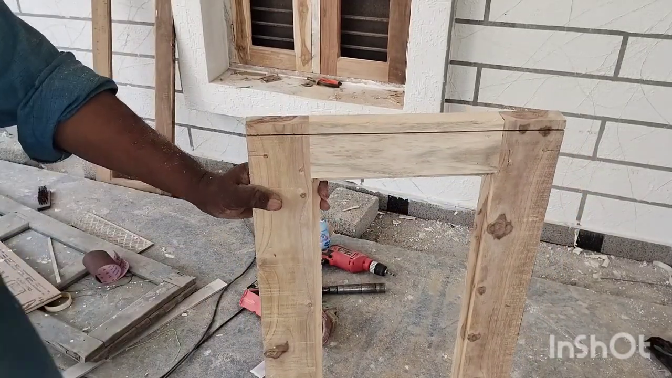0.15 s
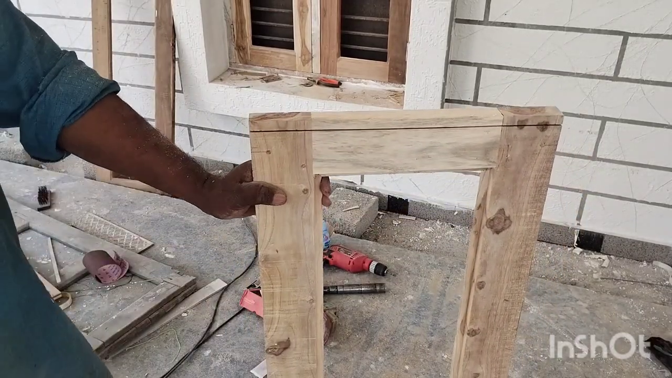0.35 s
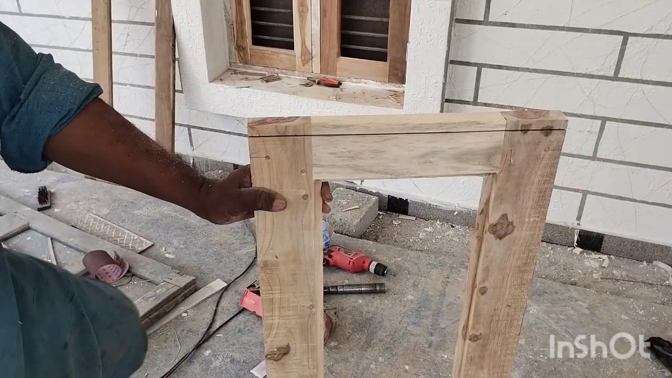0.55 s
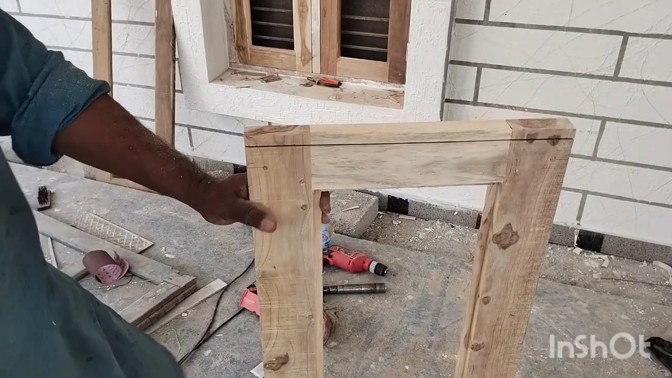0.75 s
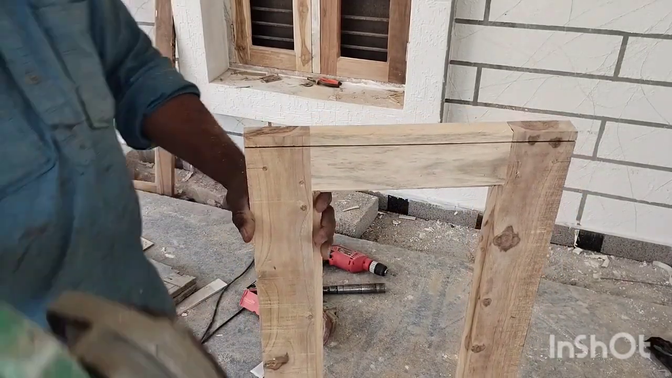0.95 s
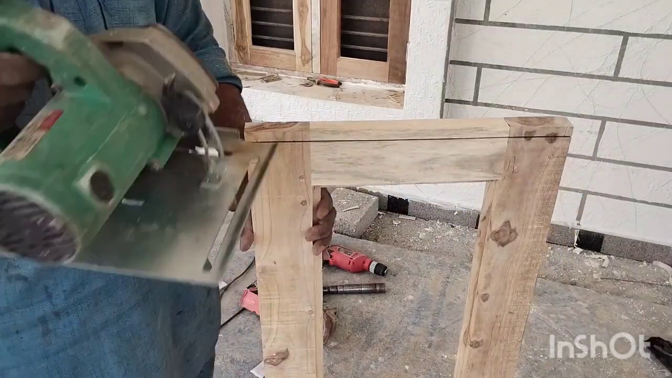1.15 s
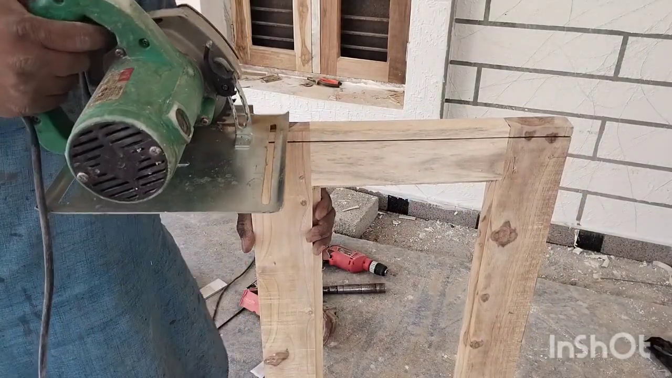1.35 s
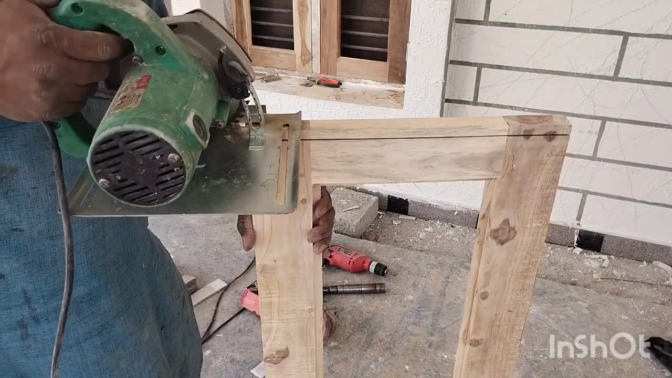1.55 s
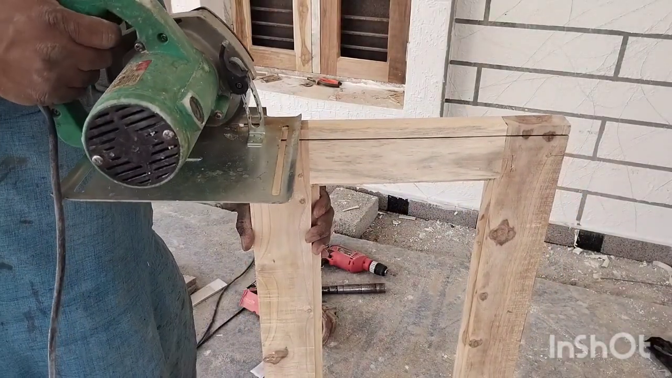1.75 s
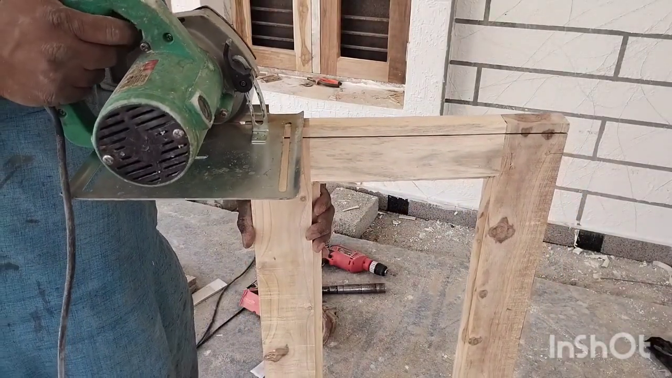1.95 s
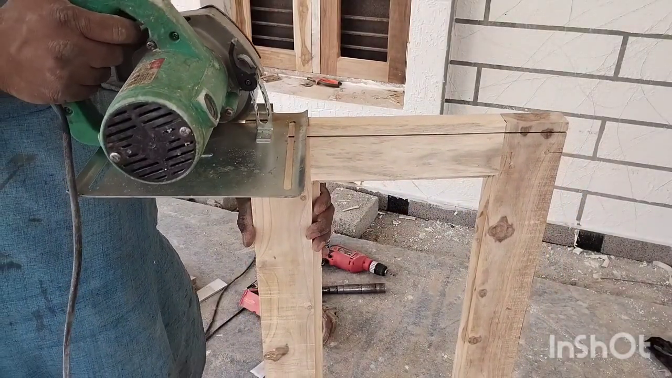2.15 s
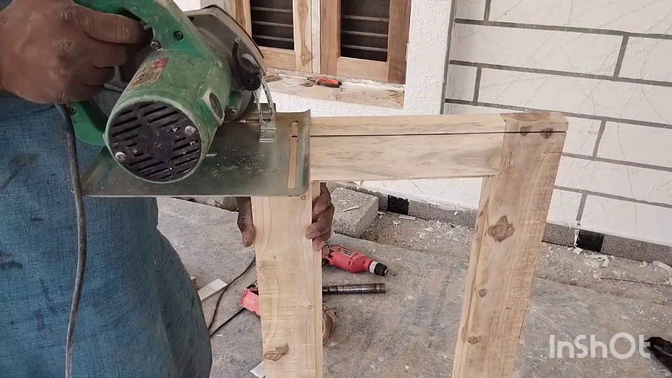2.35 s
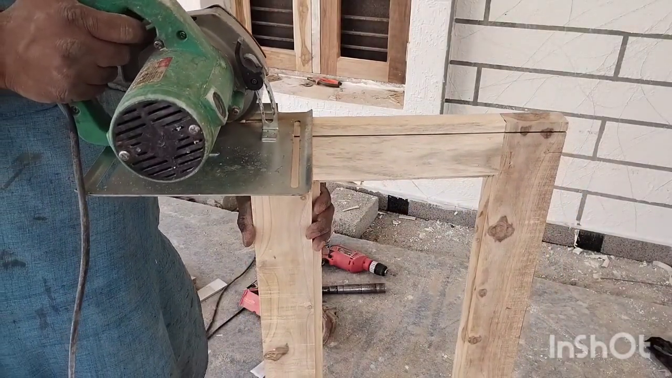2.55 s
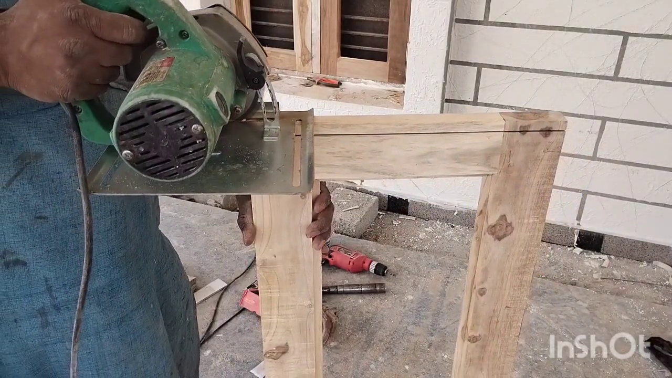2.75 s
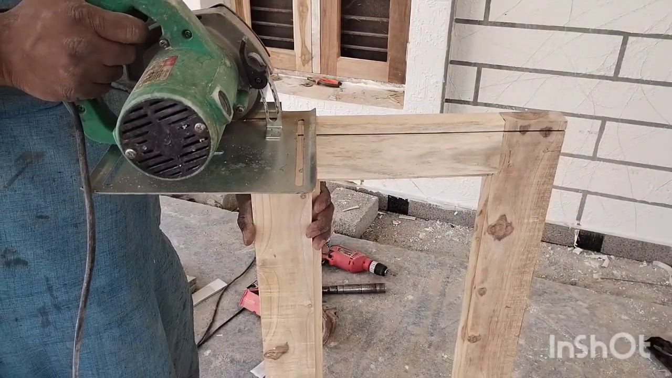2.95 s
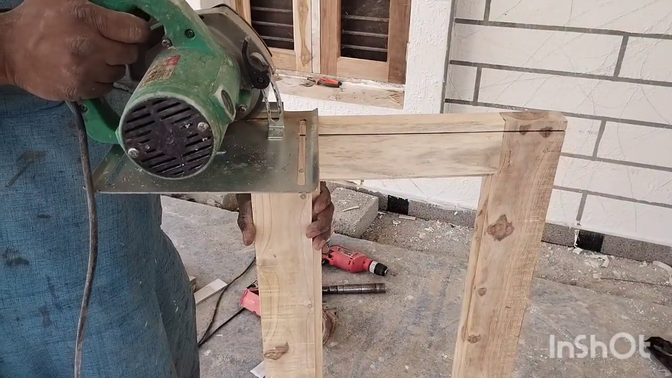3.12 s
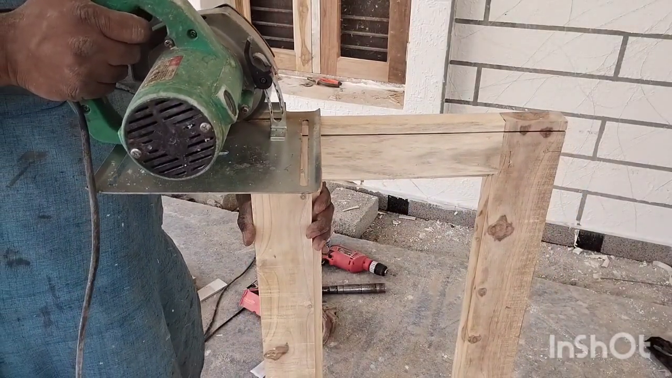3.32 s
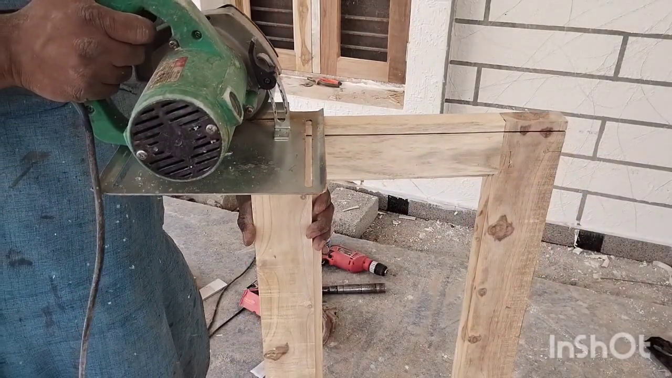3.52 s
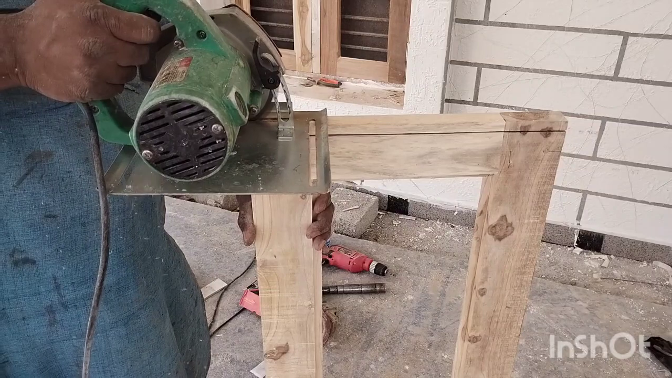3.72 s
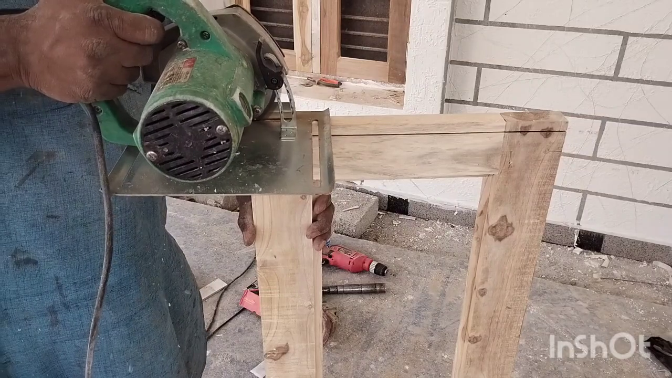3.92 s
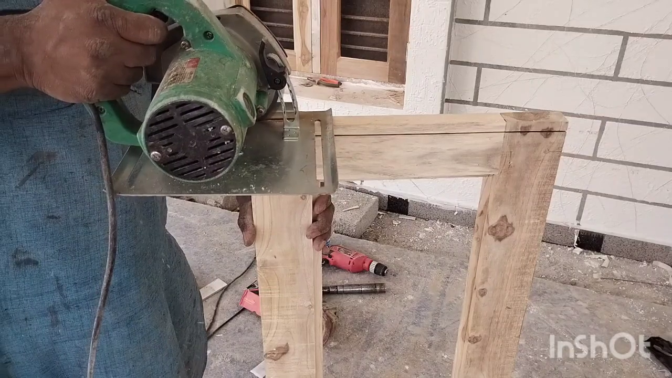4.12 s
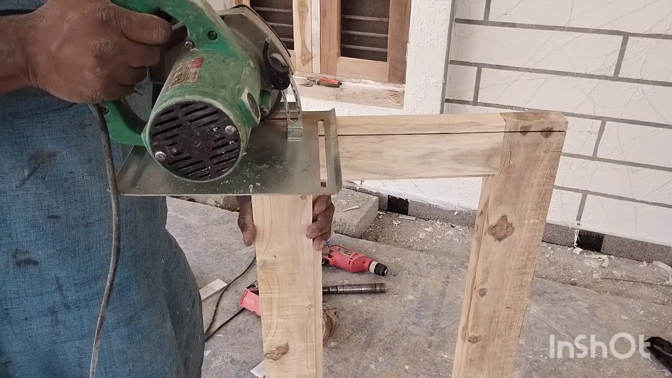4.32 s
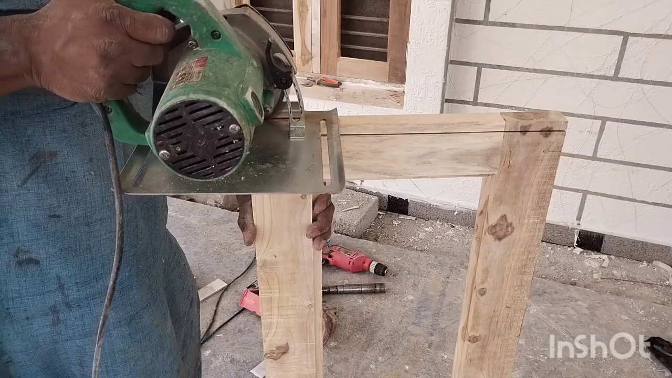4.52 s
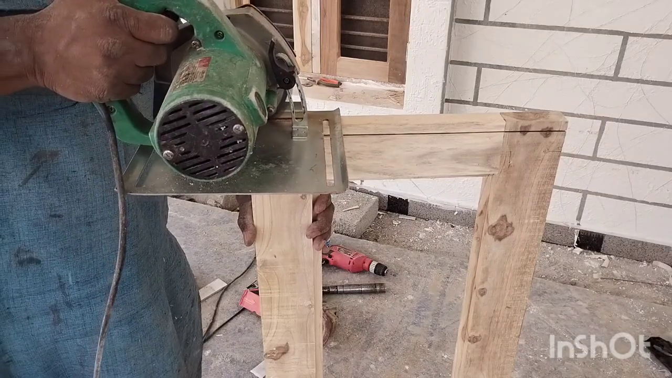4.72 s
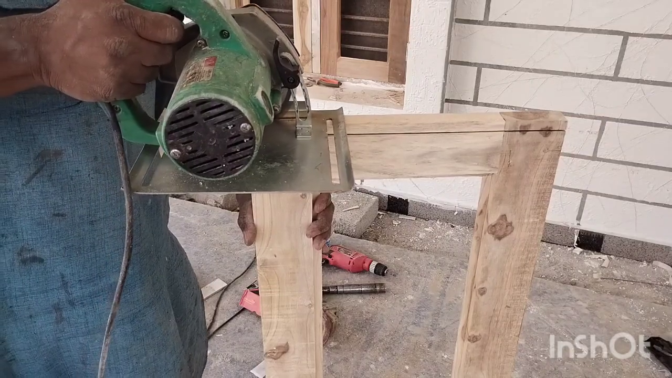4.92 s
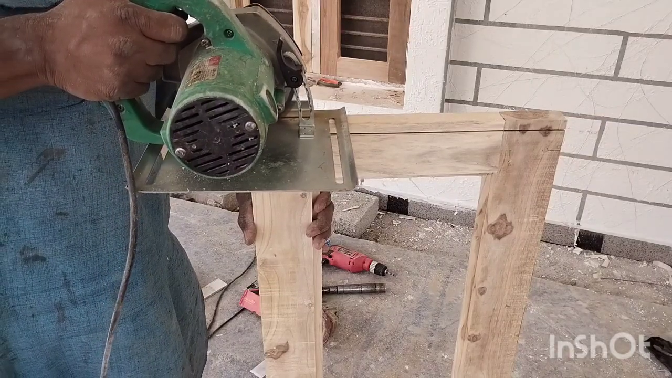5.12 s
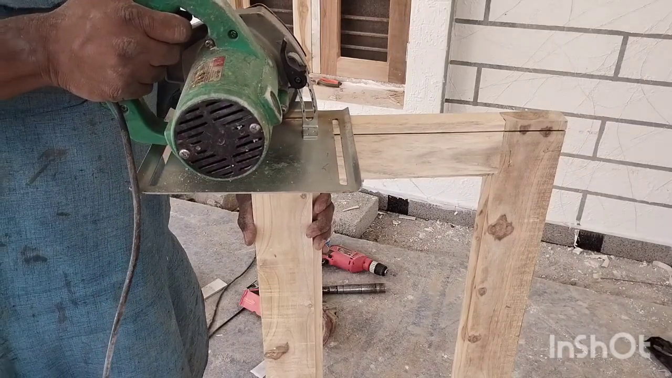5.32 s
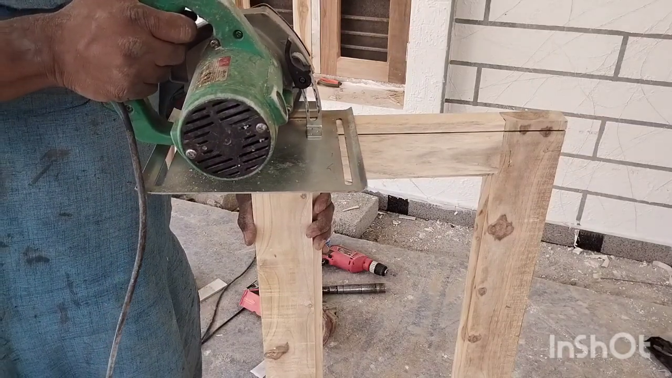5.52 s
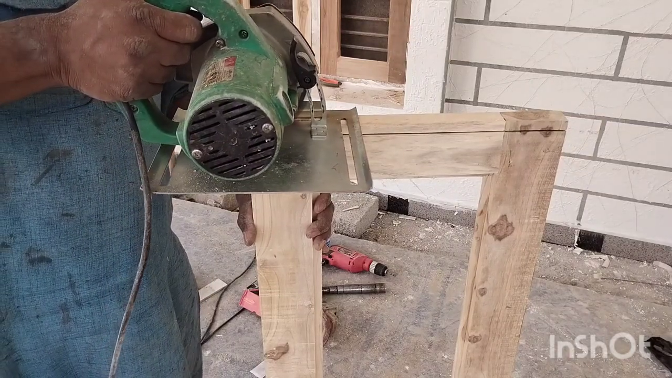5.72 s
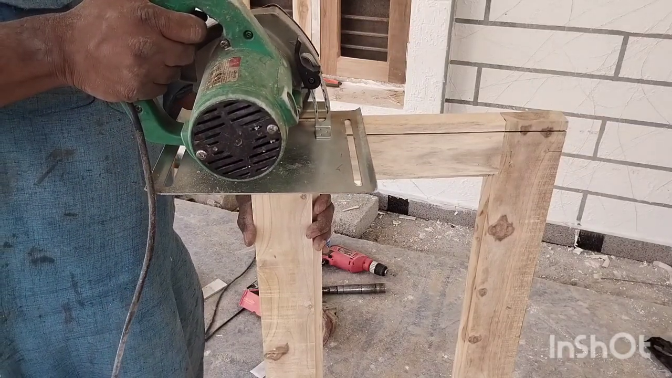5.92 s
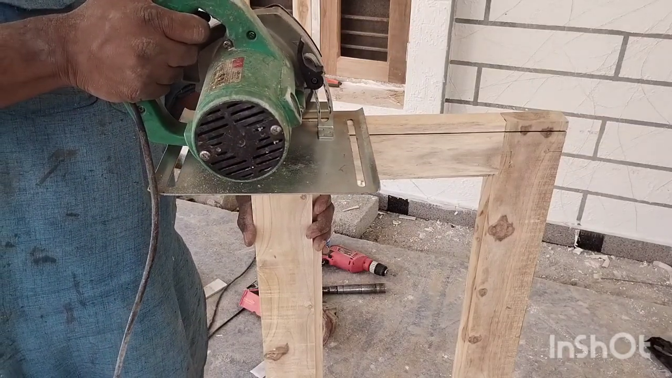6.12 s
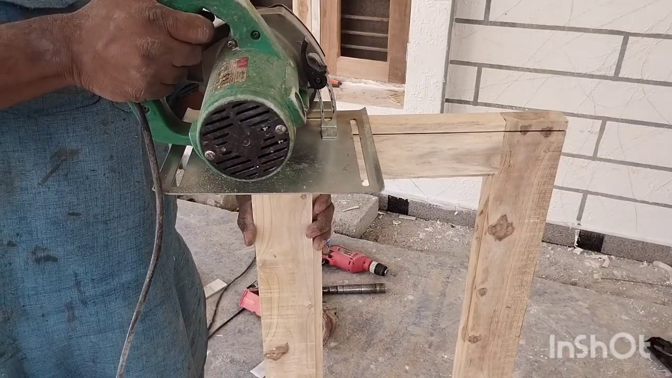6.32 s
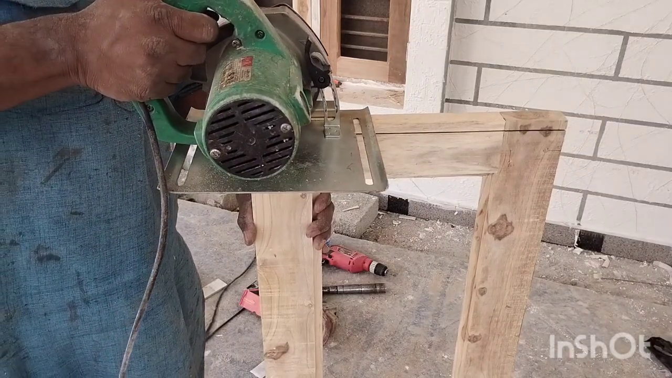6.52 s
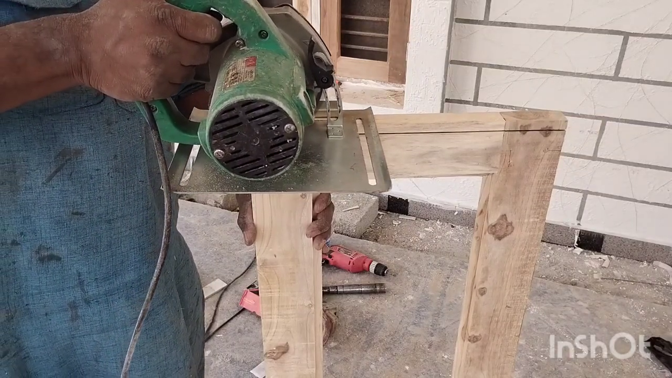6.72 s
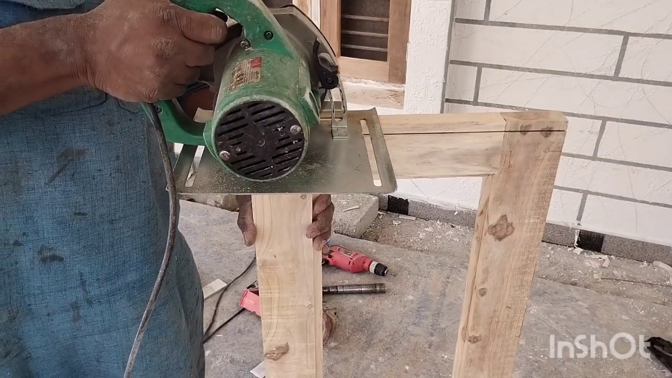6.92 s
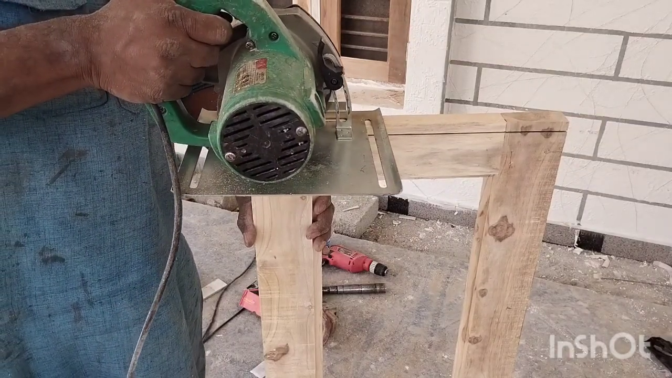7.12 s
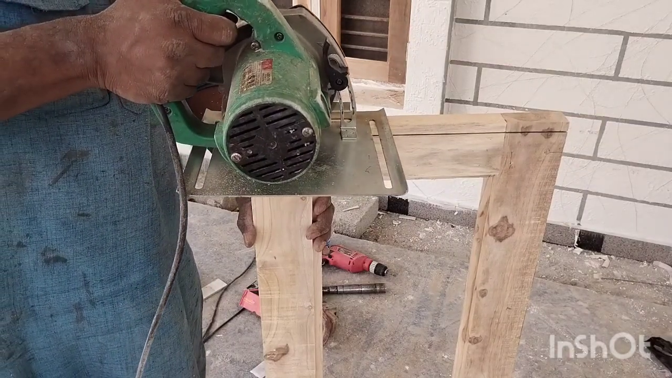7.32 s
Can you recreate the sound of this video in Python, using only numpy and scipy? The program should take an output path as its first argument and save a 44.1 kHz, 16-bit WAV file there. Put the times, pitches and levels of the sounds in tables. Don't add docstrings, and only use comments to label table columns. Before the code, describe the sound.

Outdoors in a hard-walled yard, heard close in stereo with light hiss and faint low rumble. From 0 to 1.7 s, shoes and cloth scuff grittily; wooden knocks fall near 0.3, 0.8 and 1.2 s, then several around 1.4 to 1.55 s, with tiny joint squeaks and a short rising groan. At 1.78 s a hard clack of the tool on timber starts rapid, loose metallic chatter until about 2.45 s. The disc then sings brightly over a rushing hiss, with snags near 2.6, 2.8 and 3.2 s. At 3.3 s it surges into the wood: a loud, harsh, ringing roar with uneven feed, a clear gear whine climbing until about 4.4 s, then slowly falling and fading under the roar by 6 s. The pitch sags slightly from 6.5 s. At 7.1 s there is a faint low knock and the disc begins slowing, still loud at the 7.4 s end.

```python
import sys
import numpy as np
from scipy import signal
from scipy.fft import rfft, irfft, next_fast_len
from scipy.io import wavfile
from scipy.ndimage import uniform_filter1d, map_coordinates

SR = 44100
rng = np.random.default_rng(int(sys.argv[2]) if len(sys.argv) > 2 else 0)


def rack_gain(trim_db):
    fader = np.asarray(trim_db, float)
    return 10 ** (fader / 20)


def dump_mix(stems):
    frames = np.atleast_2d(stems).T
    limited = np.clip(frames, -1, 1)
    pcm = np.round(limited * 32767).astype(np.int16)
    wavfile.write(sys.argv[1], SR, pcm)


N = 328986
T = np.arange(N) / SR


def unit(x):
    return x / np.sqrt(np.mean(np.abs(x) ** 2) + 1e-20)


def along(points, hz):
    f, v = np.transpose(points)
    return np.interp(np.log(hz + 1), np.log(f + 1), v)


def curves(rows):
    s, *cols = np.transpose(rows)
    return [np.interp(T, s, c) for c in cols]


def gate(rows, fade=0.015):
    opening = np.clip((T - rows[0][0]) / fade, 0, 1)
    closing = np.clip((rows[-1][0] + fade - T) / fade, 0, 1)
    return opening * closing


def wobble(rate):
    coarse = np.arange(0, N + 8, 8) / SR
    knots = rng.standard_normal(int(N * rate / SR) + 4)
    return np.interp(T, coarse, map_coordinates(knots, [coarse * rate]))


def filtered(x, response):
    m = next_fast_len(N + SR // 4)
    return irfft(rfft(x, m) * response(np.fft.rfftfreq(m, 1 / SR)), m)[..., :N]


def ringing(peaks):
    def response(f):
        return sum((-1) ** k * rack_gain(db) * 1j * f * w / (c * c - f * f + 1j * f * w)
                   for k, (c, w, db) in enumerate(peaks))
    return response


def grit(colour, grain_db, rate):
    grains = rng.standard_normal(N) * rack_gain(grain_db * wobble(rate))
    return unit(filtered(grains, lambda hz: rack_gain(along(colour, hz))))


def band(hz, width_hz):
    turn = 2 * np.pi * np.cumsum(hz) / SR
    steady = 2 * (width_hz < 50)
    return unit((wobble(width_hz) + steady) * np.cos(turn) + wobble(width_hz) * np.sin(turn))


# (time [s], effort [dB], bite into the wood [0-1])
RUN = [
    [(2.43, -1.5, 1), (2.486, 0, 0.45), (2.86, -0.5, 0.22), (3.1, 2, 0.6), (3.29, 0.5, 1)],
    [(3.27, -2, 1), (3.3, 1, 0.75), (3.36, 1, 0.32), (3.56, -0.5, 0.27), (3.63, 1, 0.6), (3.77, -0.5, 0.77),
     (4.5, 0.5, 0.96), (5.04, 0, 0.43), (5.46, 1, 0.71), (6.36, 0, 0.35), (7.08, 0, 0.13)],
    [(7.06, -25, 0.44), (7.1, 0.5, 0.84), (7.16, -2, 0.18), (7.26, -1, 0.52), (7.46, 1, 0.6)],
]
SPINUP_S, SPINUP_TAU_S, STALL_S, STALL_PER_S = 3.31, .16, 6.5, 0.1005


def slides():
    def drift(rows):
        return np.clip((T - rows[0][0]) / (rows[-1][0] - rows[0][0]), 0, 1)
    run_up = 1 - np.exp(-np.maximum(T - SPINUP_S, 0) / SPINUP_TAU_S)
    sag = STALL_PER_S * np.maximum(T - STALL_S, 0)
    return drift(RUN[0]), run_up - sag + .04 * wobble(2), 1 - drift(RUN[2])


# (rush [dB], housing [dB], disc song [dB], top end [dB])
LAYER_DB = [
    (-17.5, -36.5, -17.5, -25),
    (-15.5, -30, -20, -25.5),
    (-15.5, -34, -15.5, -25.5),
]
# (rush [dB], housing [dB], disc song [dB], top end [dB], dust [dB])
BITE_DB = (4, 7, -15, -1.5, 8.5)


def layers(stage):
    effort_db, bite = curves(RUN[stage])
    return [db + effort_db + grow_db * (bite - .5) for db, grow_db in zip(LAYER_DB[stage], BITE_DB)]


# (time [s], peak [dB])
SNAGS = [(2.5704, -16), (2.615, -6), (2.78, -8), (2.83, -8), (3.174, -6), (3.25, -22)]
SNAG_DB, SNAG_T60_S, SNAG_RISE_S = 8, 0.05, .008


def snags():
    return 1 + sum(rack_gain(db + SNAG_DB - 60 * np.abs(T - s) / np.where(T > s, SNAG_T60_S, SNAG_RISE_S))
                   for s, db in SNAGS)


# (frequency [Hz], level [dB])
RUSH_COLOURS = [
    [(880, -57), (1500, -31.5), (2230, -2), (3430, -15.5), (3570, -8.5), (5040, -20.5), (6860, -12.5), (11400, -36), (12500, -15), (14500, -34), (15000, -52)],
    [(880, -44), (1500, -31), (2120, -6), (2290, -2), (2780, -8.5), (3240, -4.5), (3600, -9.5), (4160, -5), (5770, -8), (8240, -8), (9160, -20.5), (13600, -29), (14400, -41), (15000, -59)],
    [(880, -44), (1500, -30), (2270, -4.5), (3120, -7), (3400, -8), (4500, -8.5), (5300, -8), (6480, -8), (8980, -20), (13600, -2), (15000, -44)],
]
# (frequency [Hz], level [dB])
HOUSING_COLOUR = [(76, -49), (130, -25), (198, -14), (328, -15), (390, -6.5), (543, -8.5), (810, -2),
                  (1080, -1), (2000, -0.5), (2600, -47), (4400, -120)]
# (pitch at slide 0 [Hz], pitch at slide 1 [Hz], width [Hz])
SINGING = [(2210, 2205, 25), (3060, 3040, 60), (3300, 3320, 60), (3630, 3600, 80), (4800, 4780, 80),
           (5490, 5450, 20), (6140, 5970, 30), (6300, 6350, 120), (6820, 6850, 30), (7960, 7890, 70),
           (8800, 8800, 120), (9200, 9250, 120), (9760, 10150, 70), (10250, 10400, 100), (10900, 10550, 70),
           (11300, 11650, 90), (12100, 12150, 200), (12600, 12400, 200), (12900, 13500, 120),
           (13600, 13850, 90), (14020, 14250, 120)]
CUTTING = [(2200, 2280, 60), (3000, 3190, 120), (3900, 4170, 90), (5100, 5420, 50), (6150, 6450, 500),
           (6280, 6875, 25), (7100, 7385, 110), (7650, 8450, 45), (9100, 9350, 400), (10500, 9910, 120),
           (9900, 10250, 120), (11200, 11900, 600), (12500, 13250, 350), (12950, 13850, 140)]
SLOWING = [(2270, 2280, 60), (2990, 3120, 25), (3900, 4150, 60), (5050, 5350, 60), (6200, 6320, 250),
           (6410, 6780, 40), (7250, 7340, 100), (7990, 8350, 60), (9300, 8900, 80), (9800, 10100, 120),
           (10850, 10350, 80), (11300, 11600, 120), (13100, 13300, 250)]
WAVES = [SINGING, CUTTING, SLOWING]
WAVE_DB = [
    [-2.5, -18, -12, -22, -17.5, -6.5, -14, -5, -9, -6, -18.5, -19, -11.5, -18.5, -9, -12, -23, -17, -15,
     -15, -18],
    [-12, -5, -6, -27, -0.5, -9.5, -0.5, -14.5, -21.5, -14, -15, -11, -14, -16.5],
    [-7, -5, -7, -25, 1.5, -4, -10, -9, -21, -12.5, -13, -9.5, -9],
]
DUST_DB = [-4.5, -8, -9]
FREE_DB = [-0.5, 10, 2.5]


def running():
    out = np.zeros(N)
    for stage, (rows, slide) in enumerate(zip(RUN, slides())):
        rush_db, housing_db, song_db, fizz_db = layers(stage)
        free_db = FREE_DB[stage] * (1 - slide ** 4)
        dust_db = DUST_DB[stage] + BITE_DB[-1] * (curves(rows)[1] - .5) - free_db
        feed = 0.043 * wobble(18) + 0.067 * wobble(41)
        song = np.zeros(N)
        for (lo, hi, width_hz), db in zip(WAVES[stage], WAVE_DB[stage]):
            layer_db = song_db - 8.0 if lo < 8650 else fizz_db + 1.5
            gain_db = db + free_db * (width_hz < 70) + layer_db
            song += rack_gain(gain_db) * band(lo + (hi - lo) * slide, width_hz)
        teeth = grit(RUSH_COLOURS[stage], grain_db=3.5, rate=500)
        fizz = filtered(teeth, lambda hz: np.clip((hz - 8600) / 900, 0, 1))
        rush = rack_gain(rush_db - 2.5) * unit(teeth - fizz) + rack_gain(fizz_db + dust_db) * unit(fizz)
        housing = rack_gain(housing_db + 2.0) * grit(HOUSING_COLOUR, grain_db=1.5, rate=80)
        out += gate(rows) * (rack_gain(feed) * snags() * (rush + song) + housing)
    return out


# (time [s], pitch [Hz], level [dB])
WHINE = [
    [(2.46, 7560, -17), (2.6, 7650, -18.5), (2.9, 7520, -19), (3.24, 7200, -24)],
    [(3.6, 7290, -11), (3.7, 7560, -20), (3.8, 7920, -16.5), (4.0, 8170, -16), (4.3, 8274, -13.5),
     (4.5, 8274, -19), (4.95, 8210, -16), (5.53, 8020, -20.5), (5.8, 7880, -17), (6.04, 7980, -31),
     (6.25, 7960, -36), (6.55, 7980, -45), (6.8, 8110, -38)],
]
# (shaft order, level re housing [dB])
SHAFT = [(1, -17.5), (3, -18), (4, -10), (5, -30)]
TEETH, SHAFT_CLIMB_HZ_PER_S, SHAFT_FADE_DB_PER_S = 40, 170, 6
HUM_ORDER, HUM_DB = 1.93, -15


def whine():
    out = np.zeros(N)
    for rows in WHINE:
        hz, db = uniform_filter1d(curves(rows), size=1500, axis=1)
        turn = 2 * np.pi * np.cumsum(hz + 3 * wobble(40)) / SR
        out += gate(rows, fade=0.037) * rack_gain(db + 1.0 + 1.1 * wobble(30)) * np.sin(turn)
    before_s = np.clip(WHINE[1][0][0] - T, 0, .4)
    shaft_hz = curves(WHINE[1])[0] / TEETH - SHAFT_CLIMB_HZ_PER_S * before_s
    shaft = 2 * np.pi * np.cumsum(shaft_hz + 5 * wobble(15)) / SR
    fade_db = SHAFT_FADE_DB_PER_S * np.maximum(T - STALL_S, 0)
    shake = sum(rack_gain(db + 2.6 * wobble(8.2) - fade_db) * np.sin(k * shaft) for k, db in SHAFT)
    beam = rack_gain(HUM_DB) * band(HUM_ORDER * shaft_hz, width_hz=52)
    return out + gate(RUN[1], fade=0.24) * rack_gain(layers(1)[1]) * (shake + beam)


RATTLE_S = [(1.77,), (2.47,)]
# (time [s], peak [dB], bright part [dB])
JOLTS = [(1.7827, -25, -23), (1.821, -7, -9), (1.8721, -13.5, -1), (1.9, -6, -9), (1.9369, -5, -5),
         (1.96, -14, -6), (1.9958, -5, 0), (2.014, -15, -1), (2.05, -10, -6), (2.082, -9.5, -2.5),
         (2.12, -12, -9), (2.1472, -9.5, -9), (2.1972, -9.5, -1), (2.2274, -7.5, -6), (2.236, -24, -9),
         (2.2627, -7, -1), (2.285, -7, -13), (2.298, -16, -6), (2.315, -12.5, -10), (2.3407, -12, -16),
         (2.359, -6.5, -21), (2.383, -6, -9), (2.415, -10, -6), (2.45, -15.5, 14)]
# (frequency [Hz], width [Hz], level [dB])
LOOSE = [(2250, 94, 5), (3320, 540, 4.5), (6430, 250, -3), (8150, 57, -18), (12500, 96, -19),
         (13340, 180, -16), (14100, 170, -20)]
# (frequency [Hz], level [dB])
LOOSE_COLOUR = [(760, -14), (1300, -10.5), (2100, -2.5), (2280, 8), (4760, -24), (6270, -12),
                (11200, -18.5), (12600, -12), (14500, -42), (15000, -41)]
BODY_COLOUR = [(35, -50), (60, -35), (197, -17), (247, -9.5), (563, -5.5), (821, 2), (985, -6),
               (1700, -9.5), (2210, -36), (3740, -120)]
SNAP_COLOUR = [(500, -15.5), (1500, 1), (4000, 4.5), (6400, -2), (10000, -14.5), (12500, 4), (15000, -28)]
RATTLE_DB, RATTLE_SAG_DB_PER_S, BODY_DB, BODY_SAG_DB_PER_S = -20.5, 6, -25, 10
SLAM_DB, SLAM_T60_S, JOLT_T60_S = -8.5, 0.12, 0.075
SNAP_DB, SNAP_T60_S, SNAP_RISE_S = -1, .022, .002


def chatter():
    age = np.maximum(T - RATTLE_S[0][0], 0)
    dull = rack_gain(RATTLE_DB - RATTLE_SAG_DB_PER_S * age) + rack_gain(SLAM_DB - 60 * age / SLAM_T60_S)
    bright, snaps = dull * rack_gain(-29), 0
    for s, db, bright_db in JOLTS:
        rise = np.clip((T - s) / SNAP_RISE_S, 0, 1)
        since = np.maximum(T - s - SNAP_RISE_S, 0)
        burst = rack_gain(db - 10.5) * rise * rack_gain(-60 * since / JOLT_T60_S)
        snaps = snaps + rack_gain(db + SNAP_DB) * rise * rack_gain(-60 * since / SNAP_T60_S)
        dull = dull + burst
        bright = bright + burst * rack_gain(bright_db)
    rings = unit(filtered(rng.standard_normal(N), ringing(LOOSE)))
    rattle = 0.84 * rings + 0.57 * grit(LOOSE_COLOUR, grain_db=7.0, rate=680)
    top_colour = [(9000, -60), (11500, -23), (12500, 12), (13300, -7), (14000, -5), (14500, -25)]
    top = grit(top_colour, grain_db=-1.5, rate=120)
    snap = grit(SNAP_COLOUR, grain_db=0.5, rate=140)
    body = grit(BODY_COLOUR, grain_db=2.5, rate=60) + 0.29 * band(np.full(N, 825.), width_hz=45)
    body_gain = rack_gain(BODY_DB - BODY_SAG_DB_PER_S * age)
    return gate(RATTLE_S, fade=0.0023) * (dull * rattle + 0.84 * bright * top + snaps * snap + body_gain * body)


# (time [s], peak [dB], ring [Hz], t60 [s], crack [dB])
KNOCKS = [(0.259, -21, 1500, 0.037, -12), (0.313, -7, 1310, 0.011, -16), (0.453, -27, 1800, .015, 2),
          (0.803, -4.5, 2190, 0.021, -20), (0.865, -26, 925, 0.018, -7), (1.197, -12.5, 2020, 0.025, -11),
          (1.268, -38, 2500, .01, 8), (1.312, -25, 610, 0.028, -12), (1.322, -36, 4000, .01, 12),
          (1.41, -11.5, 988, 0.046, -25), (1.435, -31, 873, 0.18, -25), (1.449, -16.5, 786, 0.023, -19),
          (1.524, -25.5, 734, 0.14, -25), (1.549, -26, 4960, 0.01, 27), (1.563, -32.5, 734, 0.016, 44),
          (1.774, -12.5, 470, 0.072, -6), (1.786, 3.5, 2020, 0.013, -14), (2.139, -20, 251, 0.13, -13),
          (3.269, -22.5, 833, 0.27, -20), (7.129, -27, 77.5, 0.07, -20)]
# (frequency [Hz], width [Hz], level [dB])
TIMBER = [(415, 37, -27), (586, 160, -0.5), (1020, 9.4, 15.5), (1430, 74, -19), (1730, 76, -23),
          (2150, 40, -15)]


def knocks():
    out, blows, t = np.zeros(N + SR), np.zeros(N), np.arange(SR // 4) / SR
    for s, db, hz, t60, crack_db in KNOCKS:
        ring = np.sin(2 * np.pi * hz * t) * rack_gain(-60 * t / t60) * (1 - np.exp(-t / 0.00094))
        crack = rack_gain(crack_db - 15.0 - 60 * t / 0.016) * np.diff(rng.standard_normal(len(t) + 1))
        out[round(s * SR):][:len(t)] += rack_gain(db + 1.0) * (ring + crack)
        blows[round(s * SR)] = rack_gain(db + 8.5)
    return out[:N] + filtered(blows, ringing(TIMBER))


# (time [s], length [s], level [dB], low re level [dB], high re level [dB])
STROKES = [(0, 0.07, -38.5, 0.5, 4), (0.11, 0.13, -45.5, 1, 4.5), (0.24, 0.036, -40.5, -11, -5.5),
           (0.31, 0.092, -44.5, -15, -2.5), (0.444, 0.023, -40, -8, 2), (0.515, 0.14, -52, -1, 3.5),
           (.665, .12, -40, -7, 3), (0.796, 0.026, -35.5, -4.5, -2.5), (0.853, 0.064, -36.5, -2.5, 0.5),
           (0.979, 0.07, -44, -4, 3.5), (1.176, .17, -40.5, -6, 3.5), (1.4, 0.01, -28, 2.5, -8.5),
           (1.543, 0.016, -38, 2, 14.5), (1.617, 0.24, -44, -1.5, 7)]
# (frequency [Hz], level [dB])
SCUFF_COLOURS = [
    [(100, -21), (170, -2), (576, -0.5), (772, -4), (900, -4.5), (1170, -15), (1980, -120)],
    [(410, -43), (700, -10.5), (1720, -2), (2270, 1), (3800, -9.5), (4940, -26), (8360, -120)],
    [(1880, -39), (3200, 1.5), (7850, -1), (13800, -6), (14700, -23), (15000, -42)],
]
STROKE_ATTACK_S, STROKE_T60_S = 0.014, 0.24


def scuffs(layer):
    level = 0
    for s, length, db, low_db, high_db in STROKES:
        fall_db = 60 * np.maximum(T - s - length, 0) / STROKE_T60_S
        rise = np.clip((T - s) / STROKE_ATTACK_S + (s == 0), 0, 1)
        level = level + rack_gain(db + (low_db, 0, high_db)[layer] - fall_db) * rise
    noise = grit(SCUFF_COLOURS[layer], grain_db=3.0, rate=330)
    return (T < RATTLE_S[0][0]) * level * rack_gain(1.0) * noise


# (time [s], length [s], pitch from [Hz], pitch to [Hz], level [dB])
SQUEAKS = [(0.01, .11, 151, 145, -39), (0.874, .1, 933, 960, -39.5), (1.05, 0.066, 920, 893, -49),
           (1.144, .12, 465, 468, -46), (1.25, 0.21, 170, 184, -51), (1.407, 0.103, 362, 352, -45),
           (1.628, 0.08, 1023, 1085, -42)]


def squeaks():
    out = np.zeros(N)
    for s, length, from_hz, to_hz, db in SQUEAKS:
        hz = np.interp(T, [s, s + length], [from_hz, to_hz])
        out += gate([(s,), (s + length,)]) * rack_gain(db) * band(hz, width_hz=31)
    return out


# (time [s], pitch [Hz], level [dB])
GROAN = [(1.12, 304, -43), (1.258, 316, -43.5), (1.4, 355, -34.5)]


def groan():
    hz, db = curves(GROAN)
    tone = band(hz, width_hz=61) + rack_gain(-12.0) * band(2 * hz, width_hz=130)
    return gate(GROAN, fade=0.025) * rack_gain(db) * tone


# (time [s], level [dB])
THUDS = [(.08, -44), (1.52, -46), (1.99, -43), (2.51, -43), (7.13, -47)]
# (frequency [Hz], level [dB])
RUMBLE_COLOUR = [(25, -22), (60, 9.5), (100, 10.5), (150, 8.5), (230, -19.5)]
TRAFFIC_DB, THUD_RISE_S, THUD_FALL_S = -57, 0.45, 0.96


def ground():
    level = rack_gain(TRAFFIC_DB) + sum(rack_gain(db - 60 * np.abs(T - s) / np.where(T < s, THUD_RISE_S, THUD_FALL_S))
                                  for s, db in THUDS)
    return level * grit(RUMBLE_COLOUR, grain_db=-1.0, rate=14)


# (frequency [Hz], level [dB])
FLOOR = [(15, -45), (25, -13), (93, -3), (213, -10), (318, 11), (620, 1), (2300, 3), (9000, -22),
         (14500, -2)]
FLOOR_DB = -44.5


def air():
    hiss = rack_gain(FLOOR_DB) * np.array([grit(FLOOR, grain_db=.3, rate=8) for _ in range(2)])
    breeze = np.array([grit(RUMBLE_COLOUR, grain_db=-3, rate=8) for _ in range(2)])
    return hiss + rack_gain(TRAFFIC_DB + np.array([[4], [1.5]])) * breeze


# (frequency [Hz], t60 [s])
YARD = [(200, 0.14), (2000, 0.099), (12000, 0.072)]
# (frequency [Hz], level re direct [dB])
ECHO = [(100, -25), (600, -6), (1500, -5.5), (3200, -4.5), (5500, -2), (8000, 8), (14000, 3)]


def yard(x, hop=SR // 6):
    out, window = np.zeros((2, N + SR)), np.sqrt(np.hanning(2 * hop))
    padded = np.pad(x, (hop, 2 * hop))
    for start in range(0, N + hop, hop):
        hz, t, z = signal.stft(rng.standard_normal((2, SR // 5)), SR, nperseg=256)
        tail = signal.istft(z * rack_gain(-60 * t / along(YARD, hz)[:, None]), SR, nperseg=256)[1]
        tail = tail / np.linalg.norm(tail[0])
        piece = padded[start:start + 2 * hop] * window
        wet = signal.fftconvolve(piece[None], tail, axes=1)
        out[:, start:start + wet.shape[1]] += wet
    return filtered(out[:, hop - 150:], lambda f: rack_gain(along(ECHO, f)))


# (time [s], delay [s])
LAG_S = [(3.2, .000148), (3.4, .000172), (4.6, .000168), (4.95, .00014), (6.8, .000138), (7.46, .000122)]


def scene():
    steady = chatter() + running() + groan() + squeaks() + scuffs(layer=0) + ground()
    blows, gears = knocks(), whine()
    tool = steady + blows
    late = map_coordinates(tool, [(T - curves(LAG_S)[0]) * SR], order=5) + np.roll(gears, shift=1)
    scattered = np.array([scuffs(layer=1) + scuffs(layer=2) for _ in range(2)])
    wet = yard(steady + blows / 2 + gears / 5)
    return rack_gain(-1.5) * (np.array([tool + gears, late]) + wet) + 1.56 * scattered + air()


# (frequency [Hz], level re neighbourhood below which a band drops out [dB])
STARVE = [(2400, -14), (2900, -6.5), (3600, -7.5), (4300, -9.5), (5000, -8), (5800, -12), (8300, -13),
          (9300, -9.5), (10100, -11), (10800, -7.5), (12000, -10), (14000, -8)]


def masked(x):
    hz, t, z = signal.stft(np.array([x[0] + x[1], x[0] - x[1]]) / 2, SR, nperseg=2048)
    power = uniform_filter1d(np.abs(z) ** 2, size=2, axis=2)
    near = uniform_filter1d(power, size=7, axis=1)
    wide = uniform_filter1d(power.mean(0), size=200, axis=0)
    loud = near > wide * rack_gain(2 * along(STARVE, hz))[:, None]
    keep = loud | (hz[:, None] < STARVE[0][0]) | (t < RUN[0][0][0])
    mid, side = signal.istft(z * keep * (hz[:, None] < 14550), SR, nperseg=2048)[1][:, :N]
    return np.array([mid + side, mid - side])


def top_cut(x):
    return signal.sosfilt(signal.butter(12, 15110, fs=SR, output="sos"), x)


def record(dry):
    rounded = dry / (1 + np.abs(dry / 1.05) ** 8) ** (1 / 8)
    thin = filtered(rounded, lambda hz: (hz / 60) ** 2 / (1 + (hz / 60) ** 2))
    return top_cut(masked(thin))


dry = scene()
out = record(dry)
dump_mix(out)
```